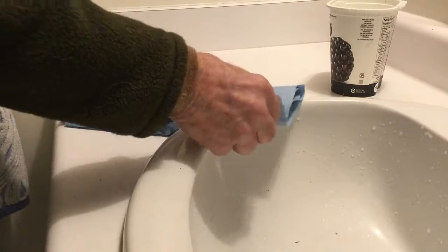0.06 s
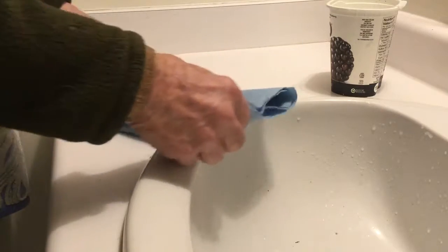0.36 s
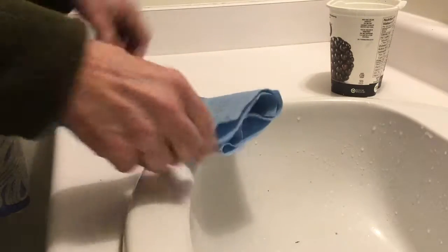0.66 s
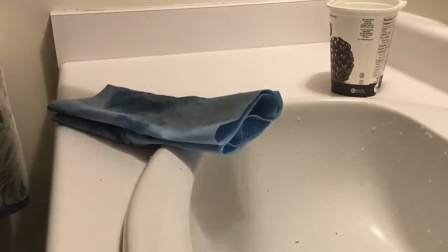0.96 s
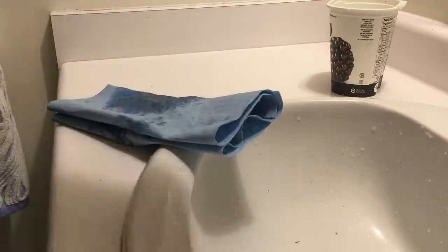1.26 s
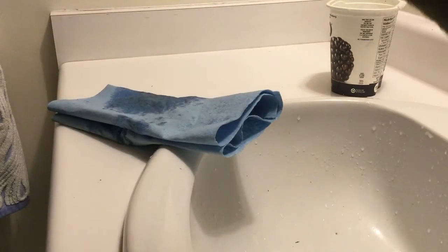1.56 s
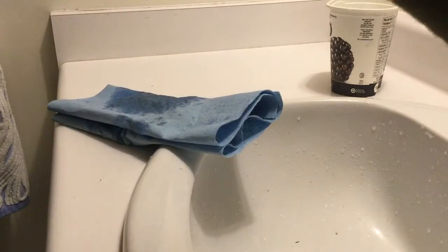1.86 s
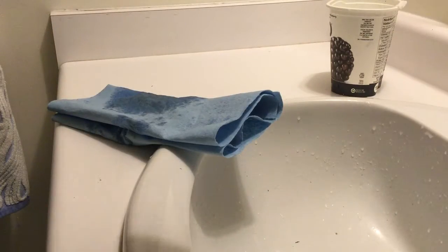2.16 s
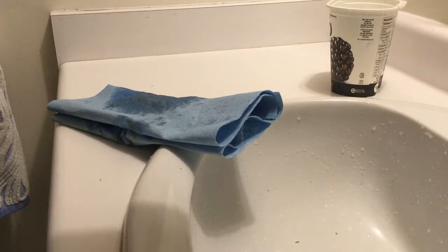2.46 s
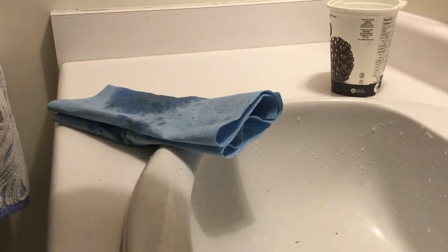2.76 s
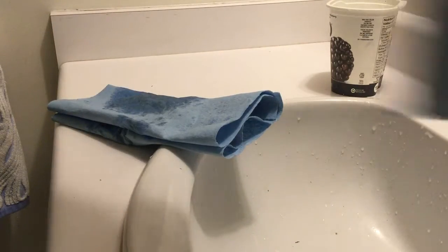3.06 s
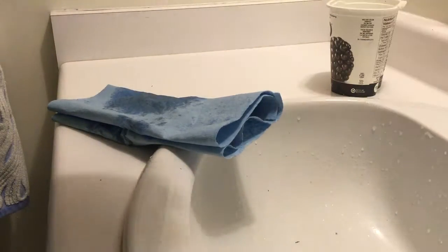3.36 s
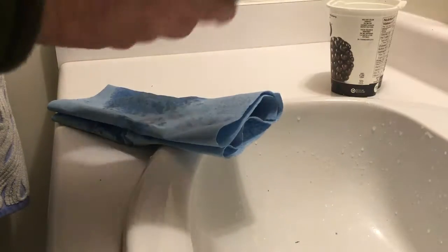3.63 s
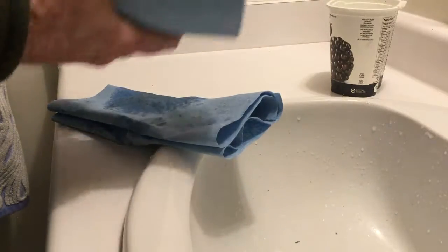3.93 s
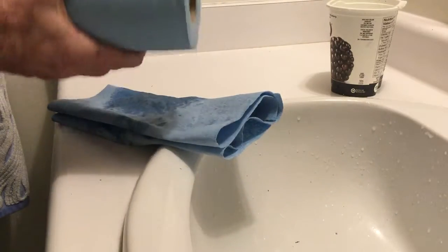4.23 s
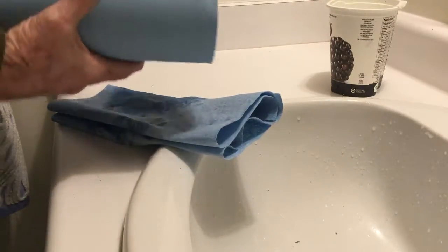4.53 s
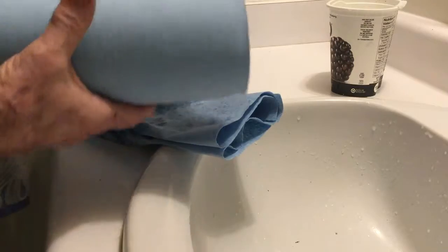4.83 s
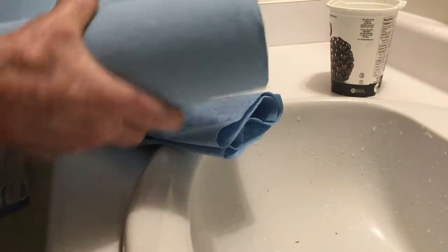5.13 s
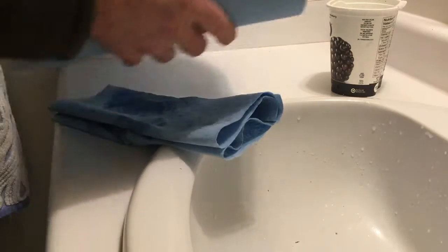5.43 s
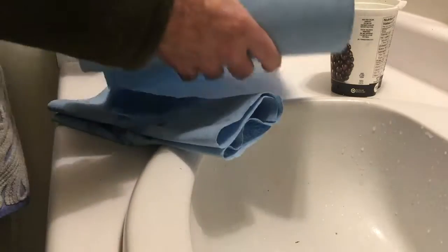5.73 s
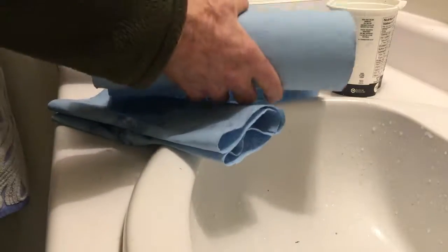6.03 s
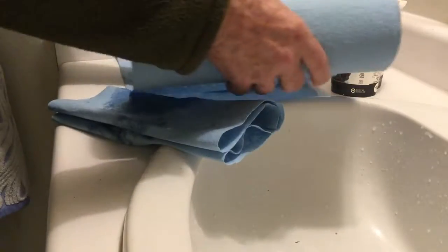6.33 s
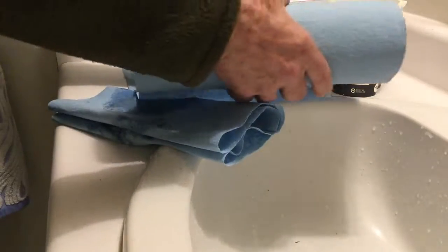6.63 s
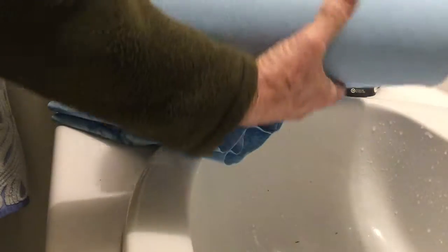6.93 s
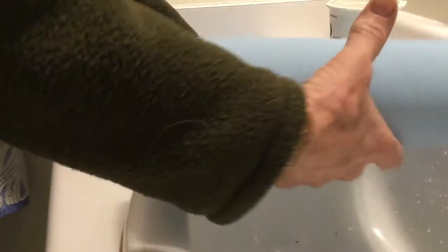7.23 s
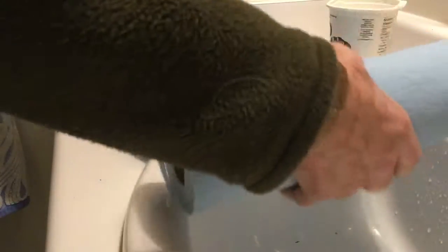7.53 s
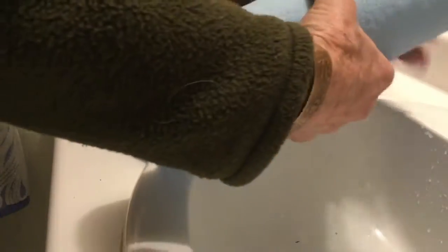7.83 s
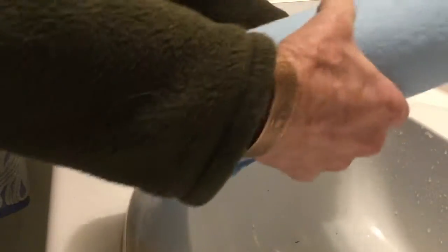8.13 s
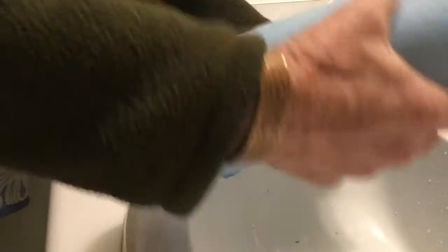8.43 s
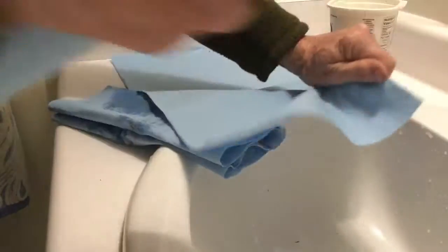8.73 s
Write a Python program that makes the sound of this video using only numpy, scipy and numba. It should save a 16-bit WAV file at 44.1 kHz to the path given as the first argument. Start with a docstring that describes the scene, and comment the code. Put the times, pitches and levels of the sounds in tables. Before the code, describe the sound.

A paper towel roll is fetched and handled close to one microphone in a small, slightly ringing bathroom. Soft presses on a damp towel come first, then light knocks, a dull drag and a sliding hiss a little farther off. Paper rustles under pats and rubs, and is unwound twice with three soft bumps in between. It ends with a loud, crackling tear along the perforation. A sleeve brushes faintly throughout.

```python
"""A small bathroom, at the sink counter: a roll of paper towel is fetched and handled.
A hand presses a damp folded towel, which fizzes. Something knocks twice, a juddering drag ends in a
third knock and the roll slides free. Hands pat and rub it, unwind a length, bump the roll three times on
the counter, pull again and tear along the perforation: fibres crackle, the sheet booms and flutters.
A sleeve brushes along as the arm moves. One close microphone, with the room ringing behind."""
import sys
import numpy as np
from scipy import signal
from scipy.fft import rfft, irfft, next_fast_len
from scipy.io import wavfile
from scipy.ndimage import uniform_filter1d, map_coordinates
from numba import njit

SR = 44100
rng = np.random.default_rng(int(sys.argv[2]) if len(sys.argv) > 2 else 0)


def dump_mix(stems):
    """Bounce the given channels to the path in sys.argv[1] as a 16-bit WAV at rate SR."""
    frames = np.atleast_2d(stems).T  # one column per channel
    limited = np.clip(frames, -1, 1)  # hard clip at full scale
    pcm = np.round(limited * 32767).astype(np.int16)
    wavfile.write(sys.argv[1], SR, pcm)


N = 396459
TIME = np.arange(N) / SR

# Spectrum of rustling paper. Each row: frequency in Hz, density in dB.
RUSTLE_SPECTRUM = [(200, -46), (370, -0.5), (450, -4.5), (600, -1.5), (740, 0), (950, 0.5), (1300, -2),
                   (1650, -1), (2300, -5.5), (3000, -10.5), (6000, -18)]
# Short hand strokes on paper. Each row: start and length in seconds, fibre hiss and sheet rustle in dB,
# pitch of the hand's hollow in Hz.
HAND_STROKES = [(0.0, 0.088, -47, -46, 520), (0.1, 0.15, -44.5, -53, 600),
                (0.227, 0.082, -41.5, -47.5, 900), (0.59, 0.051, -42, -48, 1270),
                (0.648, 0.084, -40.5, -49, 1300), (1.03, 0.17, -38, -45, 1500),
                (1.45, 0.06, -44, -53, 1110), (2.623, 0.043, -41.5, -50, 1000),
                (3.016, 0.12, -46.5, -38, 1080), (3.13, 0.32, -49.5, -44, 1160),
                (3.42, 0.077, -31, -30.5, 1080), (3.472, 0.082, -39, -42.5, 1140),
                (3.527, 0.056, -31, -34.5, 1070), (3.771, 0.11, -40.5, -40.5, 1210),
                (3.867, 0.12, -38, -35.5, 1190), (4.342, 0.067, -31.5, -29.5, 1430),
                (5.363, 0.26, -46, -48.5, 990), (5.489, .055, -36.5, -32, 970),
                (5.528, 0.11, -45, -40, 960), (5.643, 0.048, -35.5, -55, 900),
                (6.092, 0.058, -40, -57, 860), (6.372, 0.072, -39.5, -38, 1620),
                (6.549, 0.055, -47.5, -62, 1000), (7.5, 0.17, -46, -49.5, 950),
                (7.728, 0.092, -42, -47.5, 960), (7.85, 0.082, -40, -56, 980), (7.9, 0.32, -39, -39, 980),
                (8.059, 0.25, -28, -33, 1010), (8.782, 0.16, -45, -40, 1200)]
# Paper speed as loudness, one curve per unwinding pull. Each row: time in seconds, level in dB.
PULL_CURVES = [
    [(4.41, -47), (4.422, -36.5), (4.504, -26.5), (4.77, -29.5), (4.864, -24.5), (4.878, -27.5),
     (5.138, -29), (5.218, -32.5), (5.29, -67)],
    [(6.7, -80), (6.718, -38), (6.746, -29.5), (6.952, -27.5), (7.038, -30.5), (7.258, -24.5),
     (7.364, -30.5), (7.45, -41.5), (7.48, -47)],
]
# Grip in each pull. Each row: rustle and roll drone offsets in dB, loosening in dB per second,
# pitch of the hand's hollow at start and end in Hz.
PULL_GRIPS = [(2.5, -6.5, 9.5, 1230, 1080), (-1.5, -4, 4.5, 530, 620)]


def from_db(db):
    """Decibels to gain."""
    return 10 ** (np.asarray(db) / 20)


def unit_rms(x):
    """Scale to unit power."""
    return x / np.sqrt(np.mean(x ** 2) + 1e-20)


def at_hz(points, hz):
    """Read a table on a log-frequency axis."""
    known_hz, values = np.transpose(points)
    return np.interp(np.log(np.maximum(hz, 1)), np.log(known_hz), values)


def curve_gain(curve):
    """A curve of seconds and dB as gain over time, silent outside its span."""
    times_s, levels_db = np.transpose(curve)
    inside = uniform_filter1d(1. * ((TIME >= times_s[0]) & (TIME < times_s[-1])), size=200)
    return inside * from_db(np.interp(TIME, times_s, levels_db))


def swell(start_s, end_s, attack_s, release_s):
    """Attack, hold and release; height 1."""
    return np.clip(np.minimum((TIME - start_s) / attack_s, (end_s - TIME) / release_s), 0, 1)


def movement(start_s, length_s):
    """Envelope of a short hand movement."""
    return swell(start_s, start_s + length_s, attack_s=0.24 * length_s, release_s=0.53 * length_s)


def movement_gains(rows):
    """Hiss and rustle gains of a series of short movements."""
    return sum(from_db([[hiss_db], [rustle_db]]) * movement(start_s, length_s)
               for start_s, length_s, hiss_db, rustle_db, *_ in rows)


def after(start_s):
    """Slice of the half second after a blow, and its age in seconds."""
    start = int(start_s * SR)
    stop = min(start + SR // 2, N)
    return slice(start, stop), np.arange(stop - start) / SR


def burst(age_s, rise_s, fall_s):
    """Quick rise, exponential fall; height 1."""
    shape = (1 - np.exp(-age_s / rise_s)) ** 2 * np.exp(-age_s / fall_s)
    return shape / shape.max()


def noise():
    """White noise."""
    return rng.standard_normal(N)


def drift(rate_hz):
    """Slow random wander; unit power."""
    knots = rng.standard_normal(N // 20)
    return unit_rms(np.interp(TIME * rate_hz, np.arange(len(knots)), knots))


def grains(per_s, spread_db):
    """Catch and slip: random clicks of uneven size."""
    sizes = from_db(spread_db * np.minimum(rng.exponential(1, N), 4))
    signs = rng.choice([-1, 1], N)
    return sizes * signs * (rng.random(N) < per_s / SR)


def colour(x, spectrum):
    """Impose a spectrum, rolling off below its lowest point; unit power."""
    size = next_fast_len(N)
    hz = np.fft.rfftfreq(size, 1 / SR)
    gain = from_db(at_hz(spectrum, hz)) * np.minimum(hz / spectrum[0][0], 1) ** 2
    return unit_rms(irfft(rfft(x, size) * gain, size)[:N])


def resonate(x, peaks):
    """Parallel two-pole resonances."""
    out = np.zeros(N)
    for hz, width_hz, db in peaks:
        radius = np.exp(-np.pi * width_hz / SR)
        feedback = [1, -2 * radius * np.cos(2 * np.pi * hz / SR), radius ** 2]
        out += from_db(db) * (1 - radius ** 2) / 2 * signal.lfilter([1, 0, -1], feedback, x)
    return out


@njit
def moving_resonance(x, centre_hz, width_hz):
    """A two-pole resonance whose centre glides."""
    angle = 2 * np.pi * centre_hz / SR
    radius = np.exp(-np.pi * width_hz / SR)
    y = np.zeros(len(x))
    for i in range(2, len(x)):
        y[i] = x[i] - x[i - 2] + 2 * radius * np.cos(angle[i]) * y[i - 1] - radius ** 2 * y[i - 2]
    return y


def ring(age_s, modes):
    """Free ringing of struck modes, alternating in sign."""
    return sum((-1) ** k * from_db(db - 60 * age_s / t60_s) * np.sin(2 * np.pi * hz * age_s)
               for k, (hz, db, t60_s) in enumerate(modes))


def sleeve(rustle_db=-3.0, drone_db=-7.5, folds_db=0.93):
    """Hiss, rustle and drone gains of the sleeve: all follow the arm, unevenly as the folds catch."""
    # Each row: time in seconds, level in dB.
    arm_curve = [(0, -50), (.33, -49), (.45, -44), (.9, -49), (1.2, -44), (1.48, -45), (1.7, -56.5),
                 (2.7, -58.5), (3.0, -50), (3.65, -46.5), (4.25, -45), (5.33, -54), (6.05, -46),
                 (6.35, -46), (6.6, -63), (7.5, -46), (7.9, -49), (8.99, -44.5)]
    folds = from_db(folds_db * drift(18))
    return curve_gain(arm_curve) * from_db([[0], [rustle_db], [drone_db]]) * folds


def strokes(drone_db=-10.0):
    """Hiss, rustle and drone gains of the hand: the rustling sheet shakes the roll a little."""
    hiss, rustle = movement_gains(HAND_STROKES)
    return np.array([hiss, rustle, from_db(drone_db) * rustle])


def hand_hollow_hz(waver=0.11):
    """Pitch of the hollow between hand and paper: glides from grip to grip and wavers."""
    grips = [(start_s + length_s / 2, hz) for start_s, length_s, _, _, hz in HAND_STROKES]
    for curve, (*_, start_hz, end_hz) in zip(PULL_CURVES, PULL_GRIPS):
        grips += [(curve[0][0], start_hz), (curve[-1][0], end_hz)]
    return np.interp(TIME, *np.transpose(sorted(grips))) * (1 + waver * drift(12))


def rubbing(hiss_db=0.5, roll_db=2.5, judder_db=1.0, stroke_cup_db=2.0, pull_cup_db=-4.0):
    """Skin drags over paper: fibres hiss, the sheet rustles in the hand's hollow, the roll drones."""
    # Each row: frequency in Hz, density in dB.
    fibre_spectrum = [(1200, -0.5), (2800, -1), (4100, 0.5), (5200, -0.5), (7300, -2), (8800, 1.5),
                      (10200, 0), (11800, 4), (13200, -1), (14500, -7), (16000, -15)]
    # Each row: frequency and width in Hz, gain in dB.
    roll_resonances = [(78, 12, -17), (159, 45, 2), (194, 9.9, 4), (245, 22, -3), (298, 17, -8),
                       (553, 87, -9.5)]
    # Drive of the roll. Each row: frequency in Hz, density in dB.
    shiver_spectrum = [(55, 1.5), (100, -3), (260, 1), (370, -1.5), (590, -1), (900, 1)]
    powers = np.array([sleeve(), strokes(), pulls()]) ** 2
    hiss, rustle, drone = np.sqrt(powers.sum(axis=0) + 1e-18)
    grip = from_db(judder_db * drift(90))
    fibres = hiss * colour(grains(per_s=5500, spread_db=0.5), fibre_spectrum)
    hollow_hz = hand_hollow_hz()
    cupped = unit_rms(moving_resonance(grains(per_s=2500, spread_db=1.0), hollow_hz, width_hz=330))
    # strokes and pulls cup the hand, the sleeve does not
    cupping = from_db([stroke_cup_db, pull_cup_db]) @ powers[1:, 1] / rustle ** 2
    uncupped = colour(grains(per_s=2500, spread_db=0.5), RUSTLE_SPECTRUM)
    sheet = (uncupped + cupping * cupped) / np.hypot(1, cupping)
    roll = drone * unit_rms(resonate(colour(noise(), shiver_spectrum), roll_resonances))
    return grip * (from_db(hiss_db) * fibres + rustle * near_walls(sheet) + from_db(roll_db) * roll)


def pats(thud_db=-1.0, puff_db=-8.0, rise_s=0.0026):
    """Each soft contact of hand or roll gives a few low cycles and a puff of squeezed paper."""
    # Each row: start in seconds, level in dB, pitch in Hz, puff offset in dB, fall in seconds. The first two
    # rows are a low ring already sounding as the scene begins, not a touch of the hand.
    hand_pats = [(0.0, -11.5, 334, 0, 0.0077), (.002, -11, 202.4, -16, 0.022),
                 (.13, -20.5, 248, 0.5, 0.0065), (0.151, -25, 206, -4, .016), (1.385, -34.5, 187, 3, 0.01),
                 (1.554, -36.5, 203, 1, 0.017), (1.907, -10.5, 213, -32, .0083),
                 (1.923, -12, 216, -30, .011), (2.649, -29.5, 197, -10, 0.0046), (3.049, -38, 205, 3, .012),
                 (3.446, -21.5, 148, -26, 0.0051), (3.636, -28.5, 198, 0.5, 0.0048),
                 (3.729, -28.5, 88, -19, 0.023), (3.784, -23, 165, 3.5, 0.018), (3.994, -37, 296, 10, 0.01),
                 (4.32, -23, 187, -.5, 0.0086), (5.497, -26, 218, -2, .016), (5.52, -28, 187, 8.5, 0.025),
                 (5.636, -19.5, 145, -0.5, 0.011), (5.899, -37.5, 207, 4.5, 0.005),
                 (6.942, -18.5, 193, -5, 0.012), (7.553, -27, 187, -10, 0.0047),
                 (8.04, -5.5, 178, -39, 0.0034), (8.057, -19, 242, -7, .014), (8.119, -14, 186, -7, 0.007),
                 (8.139, -16, 206, -25, .012), (8.338, -10, 191, 4.5, 0.0067), (8.597, -13, 243, 0, 0.02)]
    # Each row: frequency in Hz, density in dB.
    puff_spectrum = [(100, 11.5), (240, 7), (350, 6), (480, 1), (750, -3), (1500, -12), (3000, -16),
                     (9000, -26)]
    out, puff_noise = np.zeros(N), colour(noise(), puff_spectrum)
    for start_s, db, hz, offset_db, fall_s in hand_pats + bumps():
        span, age_s = after(start_s)
        thud = from_db(thud_db) * burst(age_s, rise_s, fall_s) * np.sin(2 * np.pi * hz * age_s)
        puff = from_db(puff_db + offset_db) * burst(age_s, rise_s=0.00054, fall_s=0.027)
        out[span] += from_db(db) * (thud + puff * puff_noise[span])
    return out


def blotting():
    """Wet fibres part in fine clicks as the hand presses the damp towel."""
    # Each row: start and length in seconds, level in dB.
    presses = [(0.245, 0.053, -43), (.37, 0.21, -46), (0.587, 0.16, -45)]
    # Each row: frequency and width in Hz, gain in dB.
    damp_resonances = [(2930, 1300, 5), (5140, 1500, -2)]
    pressure = sum(from_db(db) * movement(start_s, length_s) for start_s, length_s, db in presses)
    return pressure * unit_rms(resonate(grains(per_s=2100, spread_db=0.5), damp_resonances))


def knocks(click_db=4.0, rattle_db=-7.5):
    """A hard contact clicks, rattles briefly and rings a sharp and a hollow body."""
    # Each row: start in seconds, drive of the sharp body and of the hollow body in dB.
    blows = [(1.1737, -18, -52), (1.775, -50, -33.5), (2.0131, -32, -13)]
    # Each row of both: frequency in Hz, level in dB, T60 in seconds.
    sharp_modes = [(138, -13, 0.16), (210, -6, 0.12), (294, -9.5, 0.079), (500, -8, 0.081),
                   (702, -18, 0.051), (880, -8, 0.037), (1227, -3.5, 0.033), (1580, -14, 0.033),
                   (2080, 0.5, 0.032), (2220, -7, 0.063), (2600, -8, 0.028), (2980, -10, .05),
                   (3520, -29, 0.03), (4050, -18, 0.097)]
    hollow_modes = [(77.3, -23, 0.63), (135.8, -16.5, 0.44), (195.6, -11, 0.27), (278, -12.5, 0.14),
                    (547, -6, 0.043), (683, -0.5, 0.022), (800, 5.5, 0.015), (930, -12, 0.066),
                    (1104, -5, 0.041), (1404, -11.5, 0.084), (1453, -10, 0.045), (2370, -22, 0.18),
                    (2620, -12, 0.027), (2900, -26, 0.044), (4180, -24, 0.063)]
    # Each row: frequency in Hz, density in dB.
    contact_spectrum = [(130, 9), (220, 4.5), (700, -4.5), (1500, -5), (2150, 2), (3300, -6), (4300, -7),
                        (5300, -24), (12000, -38)]
    out, contact = np.zeros(N), colour(noise(), contact_spectrum)
    for start_s, sharp_db, hollow_db in blows:
        span, age_s = after(start_s)
        click = from_db(click_db) * burst(age_s, rise_s=0.00016, fall_s=0.001)
        rattle = from_db(rattle_db) * burst(age_s, rise_s=0.00041, fall_s=0.015)
        out[span] += from_db(sharp_db) * (ring(age_s, sharp_modes) + (click + rattle) * contact[span])
        out[span] += from_db(hollow_db) * ring(age_s, hollow_modes)
    return out


def fetching(drag_db=-28.5, hiss_db=-34.5, slide_rasp_db=-46.5, drag_rasp_db=-42.0, fastest_s=2.37):
    """A dull stick-slip drag, then the hiss of the roll sliding free, speeding up and slowing."""
    # Each row of both: frequency and width in Hz, gain in dB.
    drag_resonances = [(170, 20, -28), (212.2, 9.9, 9.5), (254, 23, -28), (388, 18, -3), (710, 44, -27),
                       (1184, 40, -17), (1900, 130, -54)]
    rasp_resonances = [(810, 58, 8.5), (984, 120, 8), (1480, 210, -11)]
    # Each row: frequency in Hz, density in dB.
    slide_spectrum = [(1200, 0), (2500, -7.5), (7500, -4), (8700, 2), (10000, 1), (11500, 7), (13000, 4),
                      (16000, -3)]
    drag = swell(start_s=1.803, end_s=2.012, attack_s=0.05, release_s=0.013)
    arc_db_per_s2 = np.where(TIME < fastest_s, 64, 103)
    speed = from_db(-arc_db_per_s2 * np.minimum((TIME - fastest_s) ** 2, 1))
    slide = speed * swell(start_s=1.6, end_s=2.65, attack_s=0.04, release_s=0.03)
    judder = resonate(grains(per_s=2300, spread_db=1.5), drag_resonances)
    judder /= np.sqrt(uniform_filter1d(judder ** 2, size=1100) + 1e-12)  # a steady pull evens the slips
    rasp_gain = from_db(slide_rasp_db) * slide + from_db(drag_rasp_db) * drag
    rasp = rasp_gain * unit_rms(resonate(noise(), rasp_resonances))
    hiss = from_db(hiss_db) * slide * colour(noise(), slide_spectrum)
    return from_db(drag_db) * drag * judder + hiss + rasp


def pulls(catch_db=1.5):
    """Hiss, rustle and drone gains of unwinding follow speed; the last two fade as the grip loosens."""
    out = 0
    for curve, (rustle_db, drone_db, loosening_db_per_s, *_) in zip(PULL_CURVES, PULL_GRIPS):
        slack_db = loosening_db_per_s * np.clip(TIME - curve[0][0], 0, 1)
        slack_db += catch_db * drift(25)  # the turning roll catches in the hand
        out += curve_gain(curve) * from_db([np.zeros(N), rustle_db - slack_db, drone_db - slack_db])
    return out


def bumps(tap_hz=203, tap_puff_db=-4.5, tap_fall_s=0.0073,
          thud_hz=97.6, thud_puff_db=-41, thud_fall_s=0.015, lag_s=0.0189):
    """The roll bumps the counter, a tap and then a deep thud; returns rows for pats()."""
    # Each row: start in seconds, tap level and thud level in dB.
    landings = [(6.073, -19.5, -23.5), (6.208, -26.5, -23), (6.558, -21.5, -17)]
    taps = [(start_s, db, tap_hz, tap_puff_db, tap_fall_s) for start_s, db, _ in landings]
    thuds = [(start_s + lag_s, db, thud_hz, thud_puff_db, thud_fall_s) for start_s, _, db in landings]
    return taps + thuds


def flutter(level_db=2.0):
    """The loose sheet stirs the air into a low flutter."""
    # Each row: time in seconds, level in dB.
    flutter_curve = [(7.92, -57), (7.994, -46), (8.178, -26.5), (8.232, -43), (8.348, -29.5),
                     (8.658, -42.5), (8.99, -36)]
    # Each row: frequency in Hz, density in dB.
    air_spectrum = [(22, -38), (40, -3), (62, 2.5), (110, 0.5), (220, -9), (500, -20), (2000, -53)]
    return from_db(level_db) * curve_gain(flutter_curve) * colour(noise(), air_spectrum)


def tearing(crack_db=-7.5, boom_db=-8.0, hiss_db=-3.5, rattle_db=-6.0):
    """Fibres part in a crackle; each crease or run of perforations snaps and plucks the sheet."""
    # Each row: start and length in seconds, fibre hiss and sheet rattle in dB.
    rips = [(8.266, 0.16, -21.5, -30), (8.36, 0.21, -38, -26), (8.558, 0.091, -32, -19.5)]
    # Each row: start in seconds, level in dB, boom offset in dB.
    snaps = [(3.429, -38, -20), (3.787, -32, 8.5), (4.321, -30, 5), (4.352, -38, -7), (5.496, -24, -13),
             (5.648, -18, -17), (8.268, -10, -5), (8.285, -3.5, -5.5), (8.297, -10, -2), (8.307, -8, -2),
             (8.326, -15, 0), (8.341, 0.5, -7), (8.353, -4, -5), (8.368, -7, -1), (8.391, -19, 11.5),
             (8.403, -14.5, 12), (8.427, -13, 5), (8.432, -23, 9), (8.456, -11, 7), (8.468, -12.5, -2),
             (8.502, -23, 0), (8.568, -15.5, -8), (8.595, -7, -16), (8.605, -10, -3), (8.622, -13, 4)]
    # Each row: frequency in Hz, level in dB, T60 in seconds.
    sheet_modes = [(199.7, -0.5, 0.065), (307, -5.5, 0.051), (481, -13.5, 0.15), (613, -10, 0.073),
                   (688, -3, 0.051), (890, -2, .04), (1462, 0.5, 0.024), (2315, -3, 0.018),
                   (2980, -13, .012)]
    # Each row: frequency in Hz, density in dB.
    crack_spectrum = [(400, 5), (1500, -8), (4000, 0.5), (6500, -2), (9000, 0), (12000, 2), (14000, -1),
                      (16000, -20)]
    hiss, rattle = movement_gains(rips)
    parting = grains(per_s=3000, spread_db=3.0)
    out = from_db(hiss_db) * hiss * colour(parting, crack_spectrum)
    out += from_db(rattle_db) * rattle * colour(parting, RUSTLE_SPECTRUM)
    crack_noise = colour(noise(), crack_spectrum)
    for start_s, db, offset_db in snaps:
        span, age_s = after(start_s)
        # the sheet is stretched anew at each snap
        modes = [(hz * rng.normal(1, 0.068), mode_db, t60_s) for hz, mode_db, t60_s in sheet_modes]
        crack = from_db(crack_db) * burst(age_s, rise_s=0.00018, fall_s=0.0021) * crack_noise[span]
        boom = from_db(boom_db + offset_db) * ring(age_s, modes)
        out[span] += from_db(db) * (crack + boom)
    return out


def near_walls(x, counter_s=0.002036, wall_s=0.0052, echo_db=-9.0, sway=0.1527):
    """Counter and wall each return an echo whose path changes as the hands move; unit power."""
    delays_s = [lag_s * (1 + sway * drift(3)) for lag_s in (counter_s, wall_s)]
    echoes = sum(map_coordinates(x, [(TIME - delay_s) * SR], order=1) for delay_s in delays_s)
    return unit_rms(x + from_db(echo_db) * echoes)


def diffuse_tail(x, build_s=0.0044):
    """Dense reflections, lasting longest in the bass."""
    # Each row: frequency in Hz, T60 in seconds.
    decay_times = [(170, 0.46), (700, 0.31), (2000, 0.24), (6000, 0.13), (14000, 0.24)]
    age_s, response = np.arange(SR // 2) / SR, 0
    edges_hz = np.geomspace(125, 16000, 8)
    for low_hz, high_hz in zip(edges_hz, edges_hz[1:]):
        bandpass = signal.butter(2, [low_hz, high_hz], "band", fs=SR, output="sos")
        band = signal.sosfilt(bandpass, rng.standard_normal(len(age_s)))
        t60_s = at_hz(decay_times, np.sqrt(low_hz * high_hz))
        response += band * from_db(-60 * age_s / t60_s)
    response *= (1 - np.exp(-age_s / build_s)) ** 2
    return signal.oaconvolve(x, response / np.linalg.norm(response))[:N]


def bathroom(x, tail_db, modes_db):
    """Hard close walls: a short tail over a few standing waves; the moving arm stirs the reflections."""
    # Each row: frequency and width in Hz, gain in dB.
    standing_waves = [(146, 11, -3.5), (200.6, 10, 6.5), (258, 31, 6), (278, 68, -11), (450, 25, -37),
                      (633, 36, 8), (706, 22, -20)]
    stir_rad = 2 * drift(5)
    tail = np.cos(stir_rad) * diffuse_tail(x) + np.sin(stir_rad) * diffuse_tail(x)
    return x + from_db(tail_db) * tail + from_db(modes_db) * resonate(x, standing_waves)


def room_tone(level_db=-48.5):
    """Faint steady background noise."""
    # Each row: frequency in Hz, density in dB.
    quiet_spectrum = [(22, -40), (45, -6.5), (100, 0), (190, 1.5), (360, -2), (1170, -10.5), (1900, -16),
                      (5010, -14.5), (7500, -21), (8810, -14.5), (10100, -20), (11800, -14), (15500, -30)]
    return from_db(level_db) * colour(noise(), quiet_spectrum)


def scene():
    """Paper close by, fetching and knocks farther off; the same in both ears."""
    near = bathroom(rubbing() + pats() + tearing(), tail_db=-10.5, modes_db=-18.0)
    far = bathroom(fetching() + knocks(), tail_db=-5.0, modes_db=2.5)
    mono = near + far + flutter() + room_tone() + blotting()
    return np.array([mono, mono])


def record(dry, low_cut_hz=35, high_cut_hz=15800, ceiling=0.8):
    """The microphone sheds the deep bass, the highest peaks are rounded and the top is cut."""
    lean = signal.sosfilt(signal.butter(3, low_cut_hz, "high", fs=SR, output="sos"), dry)
    rounded = lean / (1 + (lean / ceiling) ** 4) ** 0.25
    return signal.sosfilt(signal.ellip(12, 0.1, 90, high_cut_hz, fs=SR, output="sos"), rounded)


dry = scene()
out = record(dry)
dump_mix(out)
```